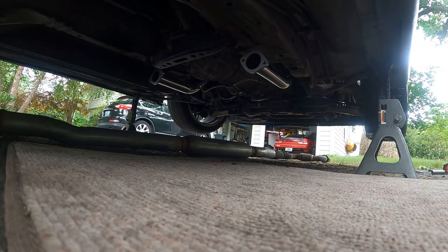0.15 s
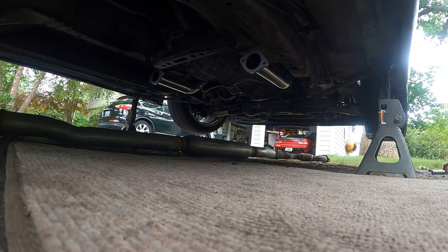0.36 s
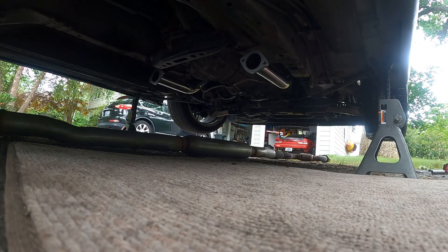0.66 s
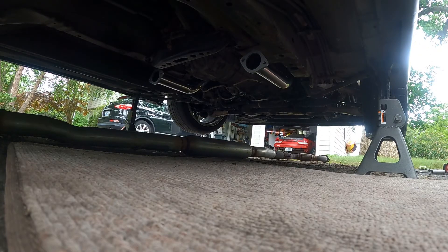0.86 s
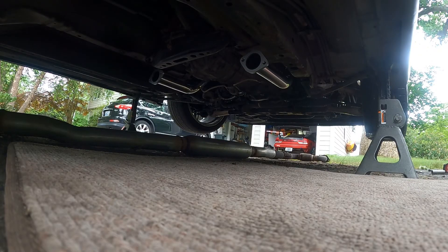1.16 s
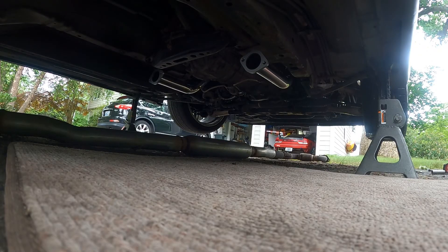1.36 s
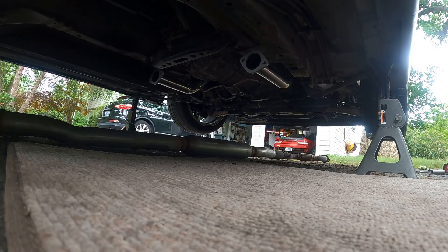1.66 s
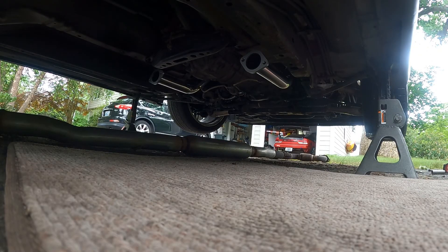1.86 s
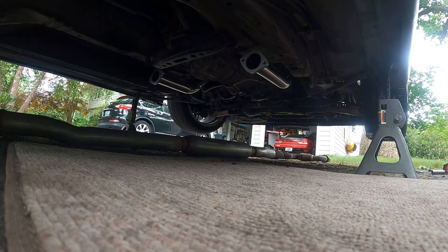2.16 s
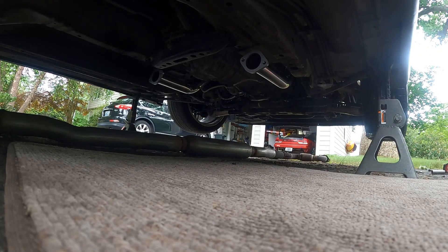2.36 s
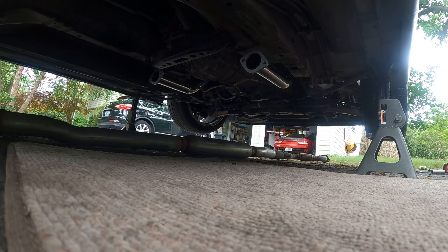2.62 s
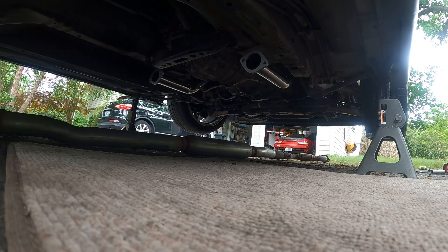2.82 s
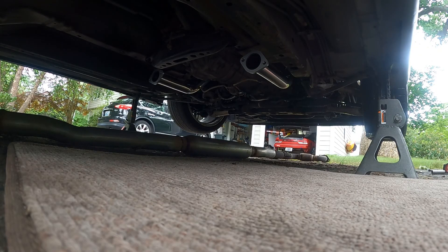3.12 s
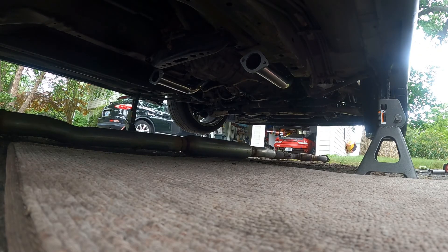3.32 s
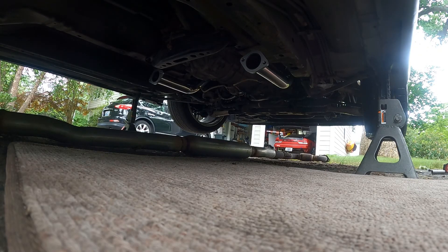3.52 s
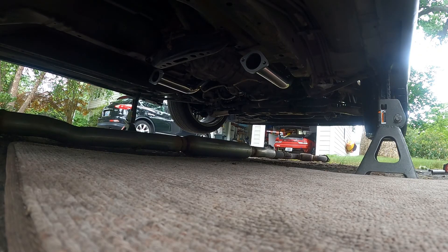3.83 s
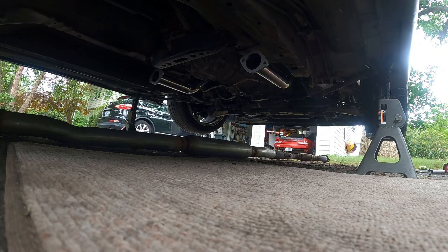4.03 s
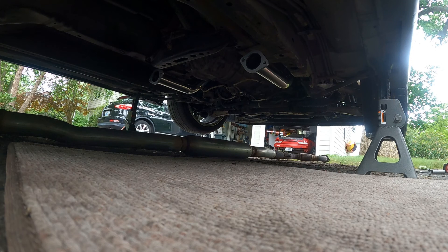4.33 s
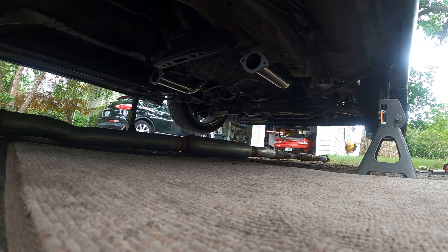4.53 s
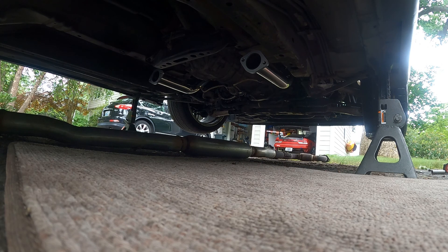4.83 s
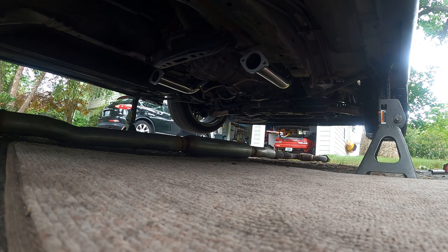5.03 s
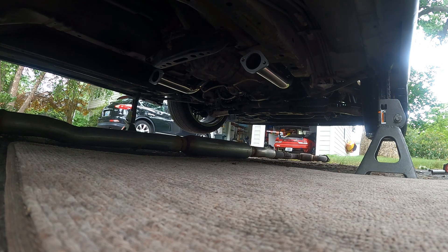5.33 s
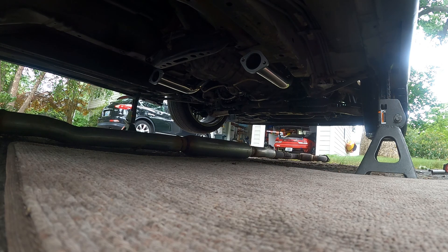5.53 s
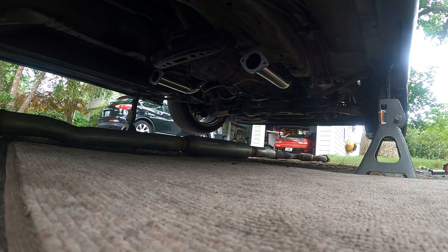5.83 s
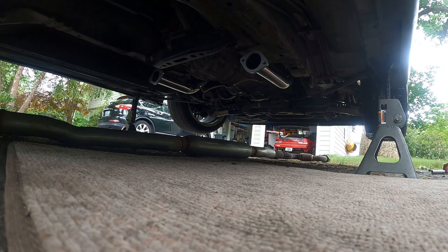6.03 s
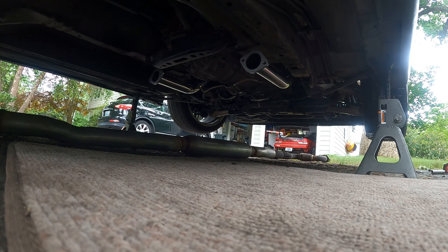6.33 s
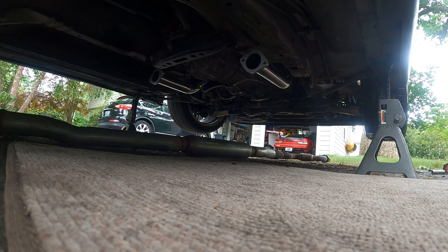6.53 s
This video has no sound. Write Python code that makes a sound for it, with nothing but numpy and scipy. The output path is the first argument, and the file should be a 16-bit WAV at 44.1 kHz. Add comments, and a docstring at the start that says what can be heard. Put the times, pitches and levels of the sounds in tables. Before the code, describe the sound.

A starter motor grinds and whines in a few quick pulses over a low boom. At about 0.4 seconds the V6 car engine, which has no exhaust fitted, catches with a burst of sharp pops and thumps. Its speed flares near 1 second, then settles into a very loud, loping idle that drones, barks and spits from the open pipes. At 3 seconds it takes one quick rev with a few hard cracks, peaking around 3.4 seconds and falling back to idle shortly after 4. At about 5.2 seconds it is switched off and coasts down with light clinks of loose steel. The last slow strokes chuff and boom separately from 5.7 to 6.2 seconds, and a few faint dull knocks follow until about 6.6. Everything is heard close up from the driveway under the car, with tight reflections and still outdoor air.

```python
"""A V6 with no exhaust fitted, heard close up from a microphone on the driveway under the car.
The starter grinds; the engine catches, idles, takes one quick rev, is switched off and coasts to rest.
Each firing thumps, barks and spits out of the open pipes, whose resonances shape the drone.
At crawling speed the strokes chuff and boom one by one, loose steel clinks and the crank knocks.
The sound scatters between floor pan and concrete, with still outdoor air behind it."""
import sys
import numpy as np
from scipy import signal
from scipy.fft import rfft, irfft
from scipy.io import wavfile
from scipy.ndimage import uniform_filter1d

SR = 44100
rng = np.random.default_rng(int(sys.argv[2]) if len(sys.argv) > 2 else 0)


def bounce(signal):
    """Save signal as a 16-bit WAV file at the path given by the first command-line argument."""
    frames = np.transpose(np.atleast_2d(signal))
    limited = np.clip(frames, -1, 1)
    pcm = np.round(limited * 32767).astype(np.int16)
    wavfile.write(sys.argv[1], SR, pcm)


N = 294270
T = np.arange(N) / SR

# starter noise: (frequency [Hz], relative density [dB])
STARTER_SPECTRUM = [(150, -43.5), (250, -33.5), (282, -5), (435, -19), (526, -8), (658, -5.5), (717, -11.5),
                    (1120, -5), (1590, -10), (2130, -9), (2580, -12), (4800, -16), (5420, -21),
                    (11800, -43), (15600, -67.5)]
# the gears take up load at each compression: (time [s], relative clash [dB], relative groan [dB])
COMPRESSIONS = [(.008, -14.5, -22), (.146, -16.5, -21), (0.273, -15, -25), (0.392, -11.5, -49.5)]
# harmonics of the loaded gear mesh: (relative level [dB])
MESH_HARMONICS = [-9.5, -3.5, -12, -9.5]
# slow strokes keep the pipes booming, lower while they are cold:
# (time [s], length [s], pitch [Hz], level [dB], release [dB/s], second pipe against first [dB])
BOOMS = [(-.003, 0.47, 57.06, -12.5, 304.5, -10), (5.661, .14, 66.7, -10, 189, -12),
         (5.881, 0.24, 62.2, -12.5, 76, -7), (6.557, 0.074, 60.5, -43.5, 150.5, -18)]
# air rumbling in the pipes: (frequency [Hz], relative density [dB])
RUMBLE_SPECTRUM = [(50, -35), (100, 10), (130, -1), (200, 0.5), (260, -16.5), (330, -26.5), (600, -58),
                   (3000, -85)]
# still air around the driveway: (frequency [Hz], relative density [dB])
AIR_SPECTRUM = [(71, -31), (120, 0), (725, -20), (1300, -20), (1500, -21), (1630, -22), (1830, -24),
                (7100, -38.5), (9430, -59), (15000, -66.5)]
# start flare, fast idle, rev, recovery: (time [s], height [firings/s], rise [s], narrowness [exponent])
SURGES = [(.51, 18.219, .464, 1.91), (1.062, 2.629, .952, 6.871), (3.03, 42.906, .358, 1.668),
          (3.325, 2.086, 1.64, 4.119)]
# gulps of air for the start and the rev: (time [s], hold [s], added charge [dB], release [s])
GULPS = [(0.391, 0.23, 12.5, 0.24), (3.044, 0.13, 6.5, 0.17), (3.054, 0.23, -8, 0.025)]
# the cold engine misses a beat: (time [s], length [s], dip [dB])
MISFIRES = [(.625, 0.033, -8.5), (0.71, 0.019, -9.5), (0.782, 0.084, -3)]
# base levels out of the pipes: (speed [firings/s], firing tone [dB], drone [dB], bark [dB])
LEVELS_BY_SPEED = [(30, -9, -13, -39.5), (56, -17, -16.5, -29.5), (71.7, -13, -15, -30),
                   (76, -12.5, -17.5, -29.5), (87.5, -13, -15, -25), (105.7, -13.5, -12.5, -25.5),
                   (107, -14, -12.5, -27)]
# pattern of the unequal cylinders: (order [per cycle], weight at idle [dB], weight revved [dB])
ENGINE_ORDERS = [(3, 13.5, 11), (5, -1.5, -8), (7, 1.5, 6), (8, 1, 1), (9, 17.5, 18.5), (10, -5.5, 2),
                 (11, -4.5, 5), (12, 15.5, 8.5), (13, -15.5, -16.5), (14, -12.5, -8.5), (15, 13, 15.5),
                 (16, -1, 11.5), (17, -1, -1), (18, 4, 8.5), (19, -7.5, -21.5), (20, -4.5, 1.5),
                 (21, 5, 13.5), (22, 5, 3), (23, -11.5, 3.5), (24, -3, 3.5), (25, -11, 0), (26, -8.5, 5),
                 (27, 2, -1), (28, -14.5, 5), (29, -13, -4.5), (30, -19.5, -12.5)]
# the open pipes and the hollow under the car: (frequency [Hz], gain [dB])
PIPE_RESPONSE = [(45, -24), (70, -10), (110, -24), (140, -15.5), (180, -8), (220, -3.5), (260, 0),
                 (300, -4.5), (350, -8.5), (430, -31.5), (500, -13.5), (600, -2.5)]
# uneven part of the burn: (frequency [Hz], relative density [dB])
BURBLE_SPECTRUM = [(25, -30), (60, -21), (130, -2), (190, -6), (260, 3.5), (320, -3), (400, -1), (600, -53),
                   (3000, -88.5)]
# in firing order; the bank nearer the microphone spits louder: (relative bark [dB], relative hiss [dB])
CYLINDERS = [(-2.5, 5.5), (6, -0.5), (2, 4.5), (-1, -6), (7.5, 3.5), (2.5, 2)]
# gas pulse of one blowdown: (frequency [Hz], relative density [dB])
BLOWDOWN_SPECTRUM = [(380, -7.5), (480, 0.5), (570, -1), (650, -6), (900, 0), (1100, -7.5), (1500, -10)]
# resonances of the pipes' air and of their steel walls: (frequency [Hz], width [Hz], gain [dB])
PIPE_MODES = [(489.8, 30, 12), (530.2, 34, 7), (680, 43, -4), (736, 45, -3.5), (927.4, 18, 3.5),
              (1080, 63, -11.5), (1250, 200, -10)]
STEEL_MODES = [(1820, 30, 3.5), (2087, 32, -1.5), (2436, 39, -4), (2840, 35, -0.5), (3100, 16, -2),
               (3560, 16, -3), (3910, 58, -2.5), (4290, 27, -10), (4850, 16, -1), (4930, 43, 0.5)]
# gas noise while firing and while coasting: (frequency [Hz], relative density [dB])
FIRING_SPECTRUM = [(600, 4), (1000, -1), (1350, 2.5), (1800, -5), (2400, -4), (3000, -8.5), (3600, -6.5),
                   (4200, -3.5), (5200, -12), (7000, -15.5), (8800, -30), (12000, -28), (14000, -43),
                   (15700, -62.5)]
COAST_SPECTRUM = [(350, -15), (600, 4), (950, 1), (1600, -3.5), (2400, -6.5), (3300, -9), (4400, -5.5),
                  (7000, -13), (9000, -22), (11000, -20.5), (12500, -21), (13600, -30), (14500, -40),
                  (15700, -46)]
# firings that go off hard: (time [s], relative sharp crack [dB], relative hollow bark [dB])
HARD_FIRINGS = [(0.4281, -5, -23.5), (0.4604, -7.5, -27), (0.4824, -6, -22), (0.5034, -19, -16.5),
                (0.521, -8, -10), (0.555, -13.5, -13.5), (0.5825, -11, -20.5), (0.6092, -8.5, -28.5),
                (0.6537, -14.5, -21), (.664, -17.5, -11), (0.6883, -13, -23), (0.729, -15.5, -16),
                (0.7617, -18, -28), (0.787, -32.5, -5.5), (1.711, -36, -30), (2.703, -25, -24),
                (3.0477, -34, -21), (3.076, -13.5, -28), (3.101, -15, -23), (3.1464, -26, -9),
                (3.229, -34, -11), (3.3, -23, -23), (3.4096, -26, -23), (3.800, -33.5, -25),
                (4.843, -24, -23), (5.275, -28, -15)]
# their sharp and hollow parts: (frequency [Hz], relative density [dB])
SHARP_SPECTRUM = [(300, -8.5), (900, -3), (2500, -7), (4300, 1.5), (6300, -7.5), (8500, -31.5),
                  (12500, -35.5), (15500, -36)]
HOLLOW_SPECTRUM = [(200, -24), (520, 1), (700, 2), (930, 6.5), (1100, -8), (1800, -11), (3000, -19.5),
                   (8000, -51.5)]
# loose steel as the engine shakes to a stop: (time [s], level [dB], strongest ring [Hz])
CLINKS = [(5.284, -29.5, 2250), (5.300, -40, 4450), (5.329, -37, 4000), (5.364, -46, 6050),
          (5.378, -32, 2450), (5.394, -32, 3920), (5.429, -32, 1460), (5.466, -39, 4400),
          (5.544, -38, 2420), (5.612, -34, 1880), (5.636, -39, 4630), (5.807, -39, 6440)]
# last strokes of air, each ringing a loose bit of steel: (time [s], puff [dB], ring [Hz], ring [dB])
CHUFFS = [(5.682, -43, 4360, -43), (5.74, -31, 4260, -56), (5.776, -36, 7200, -37), (5.807, -44, 4400, -38),
          (5.845, -39, 2350, -47), (5.88, -34.5, 4340, -54), (5.927, -41, 2340, -54),
          (5.975, -37, 4170, -37.5), (6.041, -43, 2290, -43), (6.116, -40, 4250, -43.5),
          (6.167, -57, 1680, -49.5)]
# air of those strokes: (frequency [Hz], relative density [dB])
CHUFF_SPECTRUM = [(210, -34), (350, 6), (805, 1.5), (885, 12), (988, -7), (1140, 2.5), (1560, -2),
                  (2270, -3.5), (3110, -7.5), (4260, -3), (5480, -10), (7050, -7), (8520, -18),
                  (15000, -27)]
# the crank settles: (time [s], level [dB], pitch [Hz])
KNOCKS = [(6.31, -43.5, 606), (6.375, -48.5, 980), (6.572, -54.5, 1430)]
# scatter at the microphone: (frequency [Hz], level against the direct sound [dB])
SCATTER_RESPONSE = [(60, -44), (170, -29), (350, -23), (700, -13.5), (1400, -12), (2800, -10), (5600, -9),
                    (11000, -5)]

FIRST_STROKE_S, CATCH_S, RUNNING_S, SLOWING_S, SPARK_OFF_S = .36, .43, .56, 5.2, 5.255
CRANK_HZ, IDLE_HZ, REV_HZ, FRICTION_HZ_PER_S = 28.5, 68.822, 106, 65.885  # firing rates
FIRINGS_PER_CYCLE = len(CYLINDERS)


def amp(db):
    return 10 ** (np.asarray(db) / 20)


def unit(x):
    return x / np.sqrt(np.mean(x ** 2) + 1e-20)


def noise():
    return rng.standard_normal(N)


def ramp(start, end):
    return np.clip((T - start) / (end - start), 0, 1)


def hold(start, attack, length, release):
    """Envelope that opens, stays open and dies away."""
    return ramp(start, start + attack) * np.exp(-np.maximum(T - start - length, 0) / release)


def burst(start, rise, decay):
    """Envelope of one puff."""
    age = np.maximum(T - start, 0)
    return (1 - np.exp(-age / rise)) * np.exp(-age / decay)


def wander(hz):
    """Random drift of rms 1, mostly slower than hz."""
    return unit(irfft(rfft(noise()) / (1 + (np.fft.rfftfreq(N, 1 / SR) / hz) ** 4), N))


def gain_at(spectrum, hz):
    freqs, db = np.transpose(spectrum)
    return amp(np.interp(np.log(hz + 1), np.log(freqs + 1), db))


def colour(x, spectrum):
    """Causal filter of unit energy, shaped like the spectrum."""
    gain = gain_at(spectrum, abs(np.fft.fftfreq(8192, 1 / SR)))
    log_gain = np.log(np.maximum(gain, 1e-5))
    taps = np.fft.ifft(np.exp(np.conj(signal.hilbert(log_gain)))).real[:4096]
    return signal.oaconvolve(x, taps / np.linalg.norm(taps))[:N]


def resonate(x, hz, width):
    radius = np.exp(-np.pi * width / SR)
    return 2 * signal.lfilter([1 - radius], [1, -radius * np.exp(2j * np.pi * hz / SR)], x).real


def ring_modes(x, modes):
    return sum(amp(db) * resonate(x, hz, width) for hz, width, db in modes)


def noise_band(hz, width, skirt):
    return unit(resonate(resonate(noise(), hz, width), hz, skirt))


def steel(x):
    """Noise picks up the ring of the pipe walls."""
    return 1.077 * (x + ring_modes(x, STEEL_MODES))


def levelled(x):
    """Evens out the slow level and leaves the single firings."""
    power = uniform_filter1d(uniform_filter1d(x ** 2, 4000), 4000)
    return x / np.sqrt(power + 1e-4 * np.mean(x ** 2))


def firings(count, cylinder_db, scatter_db):
    """One impulse at each whole firing count, sized by its cylinder and by chance."""
    at = np.flatnonzero(np.diff(np.floor(count)) > 0)
    number = np.arange(len(at)) + 1
    chance_db = scatter_db * rng.standard_normal(1000)[number]
    train = np.zeros(N)
    train[at] = amp(cylinder_db[number % FIRINGS_PER_CYCLE] + chance_db)
    return train


def puffs(train, rise, decay, steady):
    """Turbulence flares as each valve opens, over a steady flow."""
    flare = signal.oaconvolve(train, burst(0, rise, decay)[:SR // 8])[:N]
    return levelled((levelled(flare) + steady) * noise())


def firing_rate():
    """Firings per second: up to idle, surges that rise fast and settle slowly, then friction."""
    rate = CRANK_HZ + (IDLE_HZ - CRANK_HZ) * ramp(CATCH_S, RUNNING_S)
    for start, height, rise, narrowness in SURGES:
        age = np.maximum(T - start, 0) / rise
        rate += height * (age * np.exp(1 - age)) ** narrowness
    return np.maximum(rate - FRICTION_HZ_PER_S * np.maximum(T - SLOWING_S, 0), 0)


def intake(rate, leak=.23, valve_close_hz=6.3):
    """Air per firing and roughness of the burn; the idle valve closes as the speed rises over idle."""
    gulps = sum(amp(db) * hold(start, .008, length, release) for start, length, db, release in GULPS)
    idle_valve = np.exp(-np.maximum(rate - IDLE_HZ, 0) / valve_close_hz)
    roughness = .18 + .1 * np.tanh(gulps / 2)
    return leak + idle_valve + gulps, roughness


def starter():
    """Gears grind and whine; at each compression they clash, groan and sag in pitch."""
    clash = sum(amp(db) * burst(start, rise=.0012, decay=.0084) for start, db, _ in COMPRESSIONS)
    load = sum(amp(db) * hold(start, .0043, length=.058, release=.015) for start, _, db in COMPRESSIONS)
    level = amp(-29 + 12 * ramp(.19, .82)) + amp(-37.5) * load / load.max()
    level *= hold(-.01, attack=.0088, length=.37, release=.033)
    grind = colour(noise() * (level + clash), STARTER_SPECTRUM)
    sag = sum(np.sin(np.pi * ramp(start, start + .115)) ** 2 for start, _, _ in COMPRESSIONS)
    mesh_hz = (555 + 30 * ramp(0, .2)) * (1 - .11 * sag + .018 * wander(hz=60))
    teeth = np.cumsum(mesh_hz) / SR
    overtones = sum(np.cos(2 * np.pi * (k * teeth + rng.random())) for k in range(2, 9))
    whine = colour(unit(overtones), STARTER_SPECTRUM)
    whirr = sum(amp(db) * (1 + .68 * wander(hz=70)) * np.cos(2 * np.pi * k * teeth)
                for k, db in enumerate(MESH_HARMONICS, 1))
    rasp = resonate(resonate(noise(), hz=960, width=350), hz=1000, width=880)
    groan = unit(unit(whirr) + .96 * unit(rasp))
    return amp(-2) * steel(grind) + amp(-15.5) * level * whine + load * groan


def booms(second_pipe_ratio=1.232, attack_s=.0031):
    """The lowest resonances of the two banks' pipes ring together and beat."""
    boom = np.zeros(N)
    for start, length, hz, db, release, second_db in BOOMS:
        angle = 2 * np.pi * hz * (T - start)
        level = ramp(start, start + attack_s) * amp(db - release * np.maximum(T - start - length, 0))
        boom += level * (np.sin(angle) - amp(second_db) * np.sin(second_pipe_ratio * angle))
    return boom + .21 * boom ** 2 + .36 * boom ** 3


def rumble(rate):
    """Air rumbles in the pipes while cranking, and again as the pistons slow."""
    cranking = amp(-37.5) * (T < RUNNING_S)
    coasting = amp(-17) * ramp(SPARK_OFF_S, 5.35) * (rate / IDLE_HZ) ** 1.4
    return (cranking + coasting) * colour(noise(), RUMBLE_SPECTRUM)


def outdoor_air():
    """Still air around the driveway, faint behind the car."""
    return amp(-62.5) * colour(noise(), AIR_SPECTRUM)


def firing_tone(rate, count, roughness):
    """The note of the firing rate; below the pipes' lowest resonance its octave takes over."""
    octave = np.interp(rate, [30, 52, 64], [.98, .75, 0])
    tone = octave * np.sin(4 * np.pi * count) - np.sqrt(1 - octave ** 2) * np.sin(2 * np.pi * count)
    waver = 1 + .19 * roughness * wander(hz=7.7)
    return np.sqrt(2) * tone * waver * ramp(.37, .39) * (1 - ramp(5.6, 5.8))


def drone(rate, count, roughness, crest_firings=.85, centre_order=21.5):
    """Orders of the cycle sweep through the pipe resonances and swell together once a cycle: the lope."""
    total, power = np.zeros(N), np.zeros(N)
    cycle = (count - crest_firings + .0031 * wander(hz=25)) / FIRINGS_PER_CYCLE
    revved = np.clip((rate - IDLE_HZ) / (REV_HZ - IDLE_HZ), 0, 1)
    for order, idle_db, rev_db in ENGINE_ORDERS:
        pipe_gain = gain_at(PIPE_RESPONSE, order * rate / FIRINGS_PER_CYCLE)
        size = amp(idle_db + (rev_db - idle_db) * revved) * pipe_gain
        smear = .04 * (order - centre_order) ** 2 + .15 * rng.random()  # the pipes spread the crest
        total += size * np.cos(2 * np.pi * (order * cycle + smear))
        power += size ** 2 / 2
    burble = unit(colour(noise(), BURBLE_SPECTRUM))
    return np.sqrt(1 - roughness ** 2) * total / np.sqrt(power) + roughness * burble


def bark(valves, roughness, lag_firings=.2013, crest_firings=1.6):
    """Each blowdown, a pulse and a puff, rings the pipes; it swells once a cycle, in a steady lope."""
    bark_db, _ = np.transpose(CYLINDERS)
    lagged = np.maximum(valves - lag_firings + .012 * wander(hz=40), 0)
    pulses = firings(lagged, bark_db, scatter_db=2)
    gas = levelled(pulses) + (.8 + roughness) * puffs(pulses, rise=.002, decay=.01, steady=.5)
    drive = colour(gas, BLOWDOWN_SPECTRUM)
    ringing = ring_modes(drive, PIPE_MODES) + .22 * roughness * drive  # a rough burn fills the gaps
    band = signal.butter(3, [440, 1400], "bandpass", fs=SR, output="sos")
    swell = 1 + .42 * np.cos(2 * np.pi * (valves - crest_firings) / FIRINGS_PER_CYCLE)
    return levelled(signal.sosfilt(band, ringing)) * swell


def hiss(valves, count, charge, spark_off, fade_db_per_s=19):
    """Gas spits from the pipes; with the spark off the puffs turn long and airy, and fade."""
    _, hiss_db = np.transpose(CYLINDERS)
    spits = puffs(firings(valves, hiss_db, scatter_db=2), rise=.0018, decay=.0037, steady=.66)
    breaths = puffs(firings(count, hiss_db, scatter_db=1), rise=.001, decay=.008, steady=.3)
    firing = amp(-36.5) * charge * steel(colour(spits, FIRING_SPECTRUM))
    coast_db = -33 - fade_db_per_s * np.maximum(T - SPARK_OFF_S, 0)
    coasting = amp(coast_db) * steel(colour(breaths, COAST_SPECTRUM))
    return (1 - spark_off) * firing + spark_off * coasting


def thumps(count, hz=150.7):
    """The first full charges go off as separate low pops."""
    pops = firings(count, np.zeros(FIRINGS_PER_CYCLE), scatter_db=5)
    pops *= hold(.35, attack=.083, length=.24, release=.35)
    ring = (burst(0, rise=.002, decay=.0071) * np.sin(2 * np.pi * hz * T))[:SR // 8]
    lopsided = ring - .49 * ring ** 2  # the suck is deeper than the push
    return amp(-5.5) * signal.oaconvolve(pops, lopsided)[:N]


def engine(rate):
    """Tone, drone, bark and hiss follow the crank's speed and the charge, and dip at each misfire."""
    count = np.cumsum(rate * (T >= FIRST_STROKE_S)) / SR  # firings so far
    # above idle the tone falls behind the valves as it passes the pipes' lowest resonance
    valves = count + .55 * np.tanh(np.maximum(rate - 71.5, 0) / 26)
    charge, roughness = intake(rate)
    charge_db = 20 * np.log10(charge)
    spark_off = ramp(SPARK_OFF_S, SPARK_OFF_S + .036)
    burn = amp(sum(db * np.sin(np.pi * ramp(start, start + length)) for start, length, db in MISFIRES))
    speeds, *levels = np.transpose(LEVELS_BY_SPEED)
    tone_db, drone_db, bark_db = (np.interp(rate, speeds, db) for db in levels)
    # drone and bark are 4 dB softer until one second in, and drop again with the spark off
    cold_start_db = -4 * (1 - ramp(1, 1.001))
    drone_db += .2 * np.minimum(charge_db, 0) + cold_start_db - 7 * spark_off
    bark_db += .3 * charge_db + cold_start_db - 10 * ramp(5.35, 5.38)
    last_swell = 1 + .66 * spark_off * hold(SPARK_OFF_S, attack=.01, length=.06, release=.015)
    tone = amp(tone_db + .081 * charge_db) * last_swell * firing_tone(rate, count, roughness)
    pipes = amp(bark_db) * bark(valves, roughness) + hiss(valves, count, charge, spark_off)
    pipes += amp(drone_db) * drone(rate, count, roughness)
    pipes *= ramp(.385, .42) ** .7 * (1 - ramp(5.66, 5.76))
    return np.sqrt(burn) * tone + burn * (thumps(count) + pipes)


def cracks():
    """Hard firings burst out of the open pipes, close to the microphone."""
    sharp = sum(amp(db - 6.5) * burst(start - .001, rise=.000063, decay=.0032)
                for start, db, _ in HARD_FIRINGS)
    hollow = sum(amp(db - 7) * burst(start, rise=.00025, decay=.0056) for start, _, db in HARD_FIRINGS)
    return steel(colour(noise() * sharp, SHARP_SPECTRUM) + colour(noise() * hollow, HOLLOW_SPECTRUM))


def clinks(decay_s=.01):
    """Each knock on loose steel rings one strong mode and a handful of weaker ones."""
    out, age = np.zeros(N + SR), T[:SR // 10]
    for start, db, hz in CLINKS:
        weaker = sum(np.sin(2 * np.pi * mode_hz * age) for mode_hz in rng.uniform(1400, 7500, size=7))
        ring = np.sin(2 * np.pi * hz * age) + amp(-14.5) * weaker
        out[round(start * SR):][:len(age)] += amp(db) * ring * np.exp(-age / decay_s)
    return out[:N]


def chuffs():
    """Single lungfuls of air chuff out over a fading leak and set loose steel ringing."""
    flow = sum(amp(db) * burst(start, rise=.0026, decay=.0084) for start, db, _, _ in CHUFFS)
    leak = amp(-47) * ramp(5.6, 5.601) * (1 - ramp(5.48, 6.244))
    air = steel(colour(noise() * (flow + leak), CHUFF_SPECTRUM))
    rings = sum(amp(db) * burst(start, rise=.0016, decay=.013) * noise_band(hz, width=320, skirt=750)
                for start, _, hz, db in CHUFFS)
    return air + rings


def knocks():
    """Dull metal knocks as the crank rocks back and settles."""
    return sum(amp(db) * burst(start, rise=.0025, decay=.023) * noise_band(hz, width=620, skirt=1900)
               for start, db, hz in KNOCKS)


def pipe_hum(hz=199):
    """The pipe's third resonance sounds once, softly, at the very end."""
    return amp(-41) * burst(6.39, rise=.022, decay=.046) * np.sin(2 * np.pi * hz * T)


def under_car(mid):
    """Scatter between floor pan and concrete reaches each side of the microphone differently."""
    tail = (noise() * burst(0, rise=.001, decay=.022))[:SR // 8]
    scatter = signal.oaconvolve(mid, tail / np.linalg.norm(tail))[:N]
    side = irfft(rfft(scatter) * gain_at(SCATTER_RESPONSE, np.fft.rfftfreq(N, 1 / SR)), N)
    side -= .4 * np.gradient(mid)  # the right side hears the engine first
    return np.array([mid + side, mid - side])


def scene():
    """Start, idle, rev and run-down, in stereo from the driveway."""
    rate = firing_rate()
    car = engine(rate) + starter() + cracks() + clinks() + chuffs()
    car += rumble(rate) + booms() + knocks() + pipe_hum()
    return under_car(car + outdoor_air())


def record(dry):
    """The recorder rounds off the loudest peaks and cuts the highest treble."""
    rounded = dry / (1 + dry ** 8) ** (1 / 8)
    lowpass = signal.firwin(511, cutoff=15750, window=("kaiser", 9), fs=SR)
    return signal.oaconvolve(rounded, lowpass[None], "same")


dry = scene()
out = record(dry)
bounce(out)
```